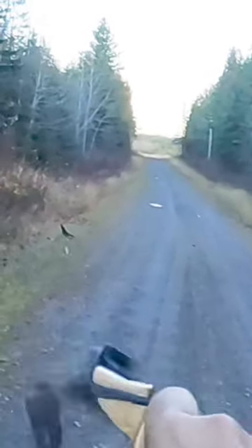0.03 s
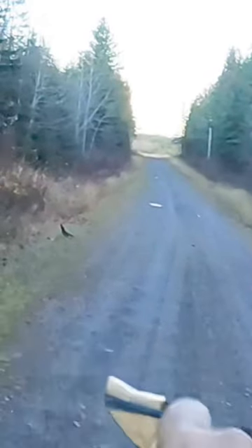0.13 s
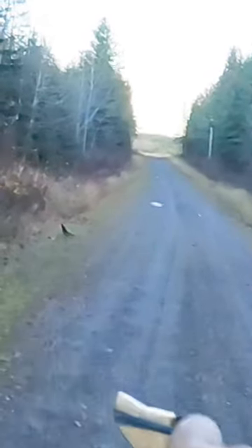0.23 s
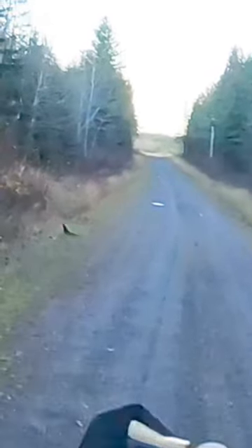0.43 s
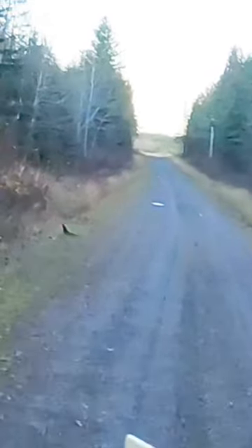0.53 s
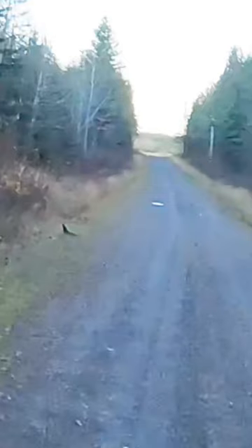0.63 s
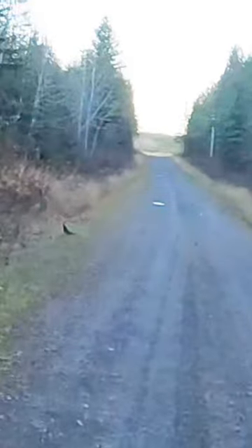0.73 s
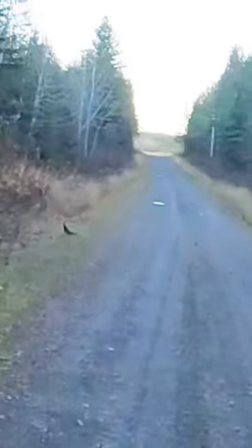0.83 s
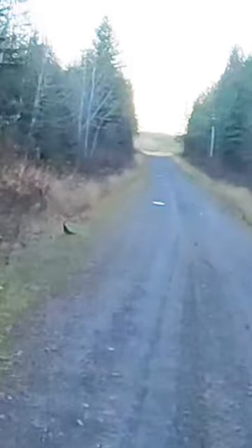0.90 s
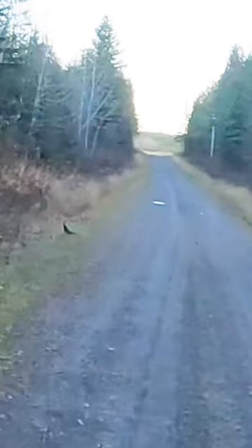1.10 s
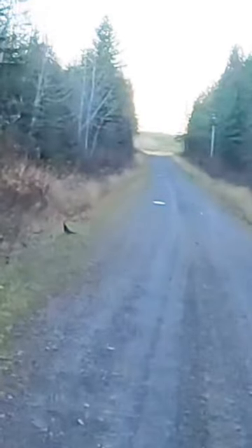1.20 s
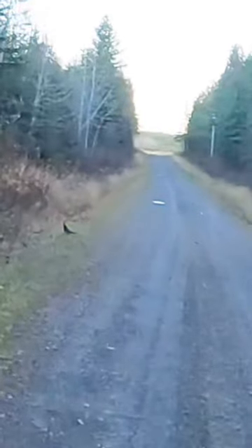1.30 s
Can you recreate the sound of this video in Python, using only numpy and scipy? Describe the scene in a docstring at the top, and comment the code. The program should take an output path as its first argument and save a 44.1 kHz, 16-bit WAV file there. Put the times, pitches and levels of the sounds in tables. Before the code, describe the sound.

Close slingshot shot outdoors, pouch popping free and bands slapping the fork, over muffled wind rumble

```python
"""Slingshot let go between trees

A slingshot is let go on a gravel track, close to a muffled pair of microphones. Wind is shaped noise;
the pouch pops free as suction pulses, and the bands swish as noise with a sinking whistle.
They slap the fork as short rings with a rattle, and slow pressure swings thud on the microphones.
Slack bands and far impacts tick as small rings, and scattered delays make the trees echo."""
import sys
import numpy as np
from scipy import signal
from scipy.io import wavfile
from scipy.ndimage import uniform_filter1d

SR = 44100
rng = np.random.default_rng(int(sys.argv[2]) if len(sys.argv) > 2 else 0)


def gain_from_decibels(decibels):
    """Convert decibel values to linear amplitude factors."""
    exponent = np.asarray(decibels, float) / 20
    return 10 ** exponent


def pcm_store(signal):
    """Save signal as 16-bit PCM."""
    levels = np.round(np.clip(np.atleast_2d(signal), -1, 1) * 32767)
    wavfile.write(sys.argv[1], SR, levels.astype(np.int16).T)


N = 59535  # samples, 1.35 s


def evened(x):
    """Brings a signal to rms 1."""
    return x / np.sqrt(np.mean(x ** 2) + 1e-20)


def read(points, hz):
    """Reads a curve at any frequency, straight lines over log frequency."""
    f, value = np.transpose(points)
    return np.interp(np.log(hz + 1), np.log(f + 1), value)


def pan(db):
    """Left and right gains that stand db apart, left louder when positive."""
    return gain_from_decibels(np.array([[db], [-db]]) / 2)


def level(curve, t):
    """Gain that follows a level curve, straight lines in dB."""
    s, db = np.transpose(curve)
    return gain_from_decibels(np.interp(t, s, db))


def ring(t, hz, t60, rise_s):
    """A tone that swells to its peak at t = 0 and dies away; at 0 Hz, the bare envelope."""
    envelope = gain_from_decibels(np.where(t < 0, -10 * (t / rise_s) ** 2, -60 * t / t60))
    return uniform_filter1d(envelope, size=21) * np.cos(2 * np.pi * hz * t)


# how alike the two sides of every noise are: f/Hz, likeness (1 = identical)
LIKENESS = [(60, 0.97), (140, 0.94), (310, 0.96), (700, 0.76), (1590, 1), (3600, 0.44)]


def noise(tone, size, patchy_db, swell_db, alike=0.97):
    """Stereo noise of a given colour with drifting patches and a shared flicker, rms 1."""
    frames = 4 * N // size + 5
    hz = np.fft.rfftfreq(size, 1 / SR)
    a, b, c, d, patches = rng.standard_normal((frames, len(hz), 5)).T
    swell = evened(uniform_filter1d(patches[0], size=3))
    patches = uniform_filter1d(patches, size=4, axis=0)
    patches = evened(uniform_filter1d(patches, size=4, axis=1))
    # the right side shares part of the left and fills up with its own noise
    same = np.clip(alike * read(LIKENESS, hz), -1, 1)[:, None]
    left = a + 1j * b
    z = np.array([left, same * left + np.sqrt(1 - same ** 2) * (c + 1j * d)])
    inside = (hz >= tone[0][0]) & (hz <= tone[-1][0])
    colour_db = read(tone, hz)[:, None] + patchy_db * patches + swell_db * swell
    z *= inside[:, None] * gain_from_decibels(colour_db)
    return evened(signal.istft(z, nperseg=size, noverlap=3 * size // 4)[1][:, :N])


# wind rumble before and after the shot, one list each: t/s, level/dB
RUMBLE_LEVEL = [
    [(0.0, -47.5), (0.038, -31), (0.05, -45), (0.064, -54), (0.072, -43.5), (0.16, -29.5)],
    [(0.36, -37.5), (0.508, -31), (0.714, -37), (0.724, -52), (0.758, -35), (0.932, -42.5), (1.024, -32.5),
     (1.202, -41.5), (1.256, -34), (1.35, -36.5)],
]
# colour of the rumble: f/Hz, relative level/dB per Hz
RUMBLE_TONE = [(2.4, -30), (4.0, -7.5), (17, 5), (24, -9), (38, -16), (59, -10.5), (71, -28), (108, -32),
               (130, -34), (170, -56), (290, -120)]
# level of the roar, pressed down after the snap and slowly recovering: t/s, level/dB
ROAR_LEVEL = [(0.0, -45), (0.18, -46), (0.432, -56.5), (0.536, -60.5), (0.774, -61.5), (0.966, -53),
              (1.194, -51.5), (1.35, -48.5)]
# colour of the roar: f/Hz, relative level/dB per Hz
ROAR_TONE = [(41, -35), (70, 0), (113, 1.5), (382, -8.5), (509, -18), (555, -19), (700, -19.5),
             (910, -47.5), (1540, -120)]
# colour of the leaf hiss: f/Hz, relative level/dB per Hz
LEAVES_TONE = [(260, -34), (450, -6.5), (511, -3.5), (571, -19), (631, -3.5), (997, -8), (1180, -5),
               (1690, -18), (4000, -58), (5200, -83.5), (8800, -120)]
LEAVES_DB = -59.5


def wind(t):
    """Lumpy rumble on the microphones, a roar that sinks after the snap, and the hiss of leaves."""
    before, after = RUMBLE_LEVEL
    rumble = level(before + after, t) * noise(RUMBLE_TONE, size=8192, patchy_db=0.95, swell_db=-0.1)
    roar = level(ROAR_LEVEL, t) * noise(ROAR_TONE, size=1024, patchy_db=3.0, swell_db=-1.0)
    leaves = gain_from_decibels(LEAVES_DB) * noise(LEAVES_TONE, size=512, patchy_db=-1.5, swell_db=-0.1)
    return rumble + roar + leaves


# how long the echoes last: f/Hz, t60/s
ECHO_T60 = [(300, .3), (800, 0.3), (1500, 1.9), (2000, 2), (2500, 0.39), (3200, 2.5)]
# colour of the echoes: f/Hz, relative level/dB
ECHO_TONE = [(200, -20.5), (600, -9), (1100, -2), (1650, -3.5), (1950, 1), (2700, 6.5), (3050, 0),
             (3500, 5.5), (4000, 0.5)]
ECHO_DB, ECHO_START_S = -25.5, 0.03


def trees(x):
    """Scattered echoes from the trunks, each band dying at its own speed."""
    strength = gain_from_decibels(2.2 * rng.exponential(1, SR))
    sparse = rng.random(SR) < 0.15
    taps = rng.standard_normal((3, SR)) * strength * sparse
    taps = taps[0] + 0.55 * taps[1:]  # a common part, and some of each side's own
    taps[:, :round(ECHO_START_S * SR)] = 0
    hz, t, z = signal.stft(taps, SR, nperseg=256)
    fade_db = read(ECHO_TONE, hz)[:, None] - 60 * t / read(ECHO_T60, hz)[:, None]
    tail = signal.istft(z * gain_from_decibels(fade_db), SR, nperseg=256)[1]
    tail = tail / np.linalg.norm(tail[0])
    mono = x.mean(0)[None]
    return gain_from_decibels(ECHO_DB) * signal.fftconvolve(mono, tail, axes=1)[:, :N]


# slack bands and far impacts: t/s, level/dB, f/Hz, t60/s, left-right/dB
TICK_RINGS = [(0.3136, -29.5, 1520, .025, -4.5), (.333, -36.5, 1256, .025, -3), (.343, -45, 2080, 0.01, -1),
              (.371, -43.5, 420, 0.017, -6), (.381, -43.5, 375, 0.018, -5), (0.389, -46, 1500, 0.011, -4),
              (.4140, -40, 1570, 0.012, -2), (.459, -47, 1199, 0.033, 2.5), (.477, -40, 645, 0.019, -7),
              (0.4846, -33, 910, 0.0085, -9), (0.4851, -37.5, 434, 0.019, 0),
              (0.5324, -35.5, 1560, 0.014, -4), (.539, -50.5, 2420, 0.012, 8)]
# colour of the scatter around each tick: f/Hz, relative level/dB per Hz
SCATTER_TONE = [(150, -31.5), (250, -0.5), (284, -3), (1600, -7), (1970, -17.5), (2460, -17), (3400, -24),
                (4000, -61), (5200, -91), (8800, -120)]
SCATTER_DB, SCATTER_T60_S = -14.5, 0.076  # level against its tick


def ticks(t):
    """Small quick rings of slack bands and far impacts, each with a broad scatter of noise."""
    scatter = gain_from_decibels(SCATTER_DB) * noise(SCATTER_TONE, size=256, patchy_db=2, swell_db=-0.5)
    out = np.zeros((2, N))
    for s, db, hz, t60, lr_db in TICK_RINGS:
        tick = ring(t - s, hz, t60, 0.00058)
        spray = scatter * ring(t - s, 0, SCATTER_T60_S, 0.0012)
        out += gain_from_decibels(db) * pan(lr_db) * (tick + spray)
    return out


# rubber ringing on the fork: t/s of the peak, f/Hz, level/dB, t60/s, left-right/dB
SLAP_RINGS = [(.2784, 1347, -7, .014, -1.5), (.2797, 1680, -8, .018, 0.5), (.2833, 790, -6, 0.0046, -4),
              (.2785, 860, -13.5, .012, -4.5), (.2810, 1085, -14, .016, -4), (.2800, 2148, -16.5, .016, -1),
              (.2795, 2420, -19, 0.016, -2.5), (.2800, 3009, -22, .018, -4), (.2785, 270, -19.5, 0.025, -9)]
# air shoved at the microphones: t/s of the peak, f/Hz, pressure (negative = suction),
# width/s, left-right/dB
AIR_THUDS = [(0.219, 40, -0.17, 0.0048, 1.5), (.232, 35, -0.26, 0.0068, -1), (.264, 21, .33, .012, -2),
             (0.2909, 30, .4, .007, 1), (0.2987, 30.05, -0.087, .006, -13.5)]
THUD_RIGHT_LEAD_S = 0.0028


def thuds(t):
    """Slow swings of pressure; those after the slap begins reach the right first."""
    out = np.zeros((2, N))
    for s, hz, peak, width, lr_db in AIR_THUDS:
        lead = THUD_RIGHT_LEAD_S * (s > SLAP_RINGS[0][0])
        u = t - s + np.array([[0], [lead]])
        out += peak * pan(lr_db) * np.exp(-(u / width) ** 2 / 2) * np.cos(2 * np.pi * hz * u)
    return out


# band noise before, between and after the blows, one list each: t/s, level/dB
SWISH_LEVEL = [
    [(0.16, -52.5), (0.18, -53.5), (0.196, -38), (0.208, -37)],
    [(0.226, -34), (0.248, -30.5), (0.27, -23.5)],
    [(0.292, -23.5), (0.302, -37.5), (0.314, -30), (0.324, -45.5), (0.334, -37), (0.356, -64),
     (0.37, -53.5)],
]
# colour of the band noise, also of the slap's rattle: f/Hz, relative level/dB per Hz
BAND_TONE = [(59, -29), (100, 0), (198, -22), (315, -13.5), (672, -15.5), (797, -18.5), (1530, -16),
             (2360, -27.5), (2710, -38.5), (3060, -31.5), (4050, -63.5), (5260, -99), (8910, -120)]
# pitch of the whistle: t/s, f/Hz
WHISTLE_PITCH = [(.19, 2000), (.238, 1950), (.25, 1600), (.268, 1498), (.32, 1441)]
WHISTLE_DB = -13.5  # against the flutter
FUZZ_HZ = 240  # width that one smoothing pass would give; the second narrows it


def swish(t):
    """Bands fluttering through the air, with a fuzzy whistle that sinks as they slow."""
    curve = [(0.12, -66)] + [row for part in SWISH_LEVEL for row in part] + [(0.42, -66.5)]
    s, hz = np.transpose(WHISTLE_PITCH)
    # slow noise on a sine and a cosine makes a narrow band around the pitch
    r = np.exp(-np.pi * FUZZ_HZ / SR)
    fuzz = rng.standard_normal((2, N))
    for _ in range(2):
        fuzz = signal.lfilter([1 - r], [1, -r], fuzz)
    phase = 2 * np.pi * np.cumsum(np.interp(t, s, hz)) / SR
    whistle = evened(fuzz[0] * np.cos(phase) + fuzz[1] * np.sin(phase))
    flutter = noise(BAND_TONE, size=256, patchy_db=2, swell_db=2.0, alike=0.87)
    return level(curve, t) * (flutter + gain_from_decibels(WHISTLE_DB) * whistle)


SLAP_RISE_S, RIGHT_LEAD_S, KNOCK_AFTER_S = 0.003, 0.00007, 0.0022
RATTLE_DB, RATTLE_RISE_S, RATTLE_T60_S = -17, 0.004, 0.052


def slap(t):
    """The rubber's short rings, a touch earlier on the right, plus a rattle of noise under the blow."""
    both = t + np.array([[0], [RIGHT_LEAD_S]])
    blow_s = SLAP_RINGS[1][0]
    rings = np.zeros((2, N))
    for s, hz, db, t60, lr_db in SLAP_RINGS:
        # the closing knock rises faster
        rise_s = SLAP_RISE_S * (0.5 if s > blow_s + KNOCK_AFTER_S else 1)
        rings += gain_from_decibels(db) * pan(lr_db) * ring(both - s, hz, t60, rise_s)
    envelope = ring(t - blow_s, 0, RATTLE_T60_S, RATTLE_RISE_S)
    rattle = envelope * noise(BAND_TONE, size=256, patchy_db=4, swell_db=3.5, alike=1.0)
    return rings + gain_from_decibels(RATTLE_DB) * rattle


# pouch slipping out of the fingers: t/s, level/dB, pulse width/ms, left-right/dB
POUCH_POPS = [(0.2, -23, 0.47, 5), (.2161, -11, 0.24, 8.5), (0.2186, -5.5, 0.42, 6.5),
              (.2144, -22, .7, 2.5)]
# dull ring of the leather, one row: t/s of the peak, f/Hz, level/dB, t60/s, left-right/dB
LEATHER_RING = (.2206, 480, -23, .08, 5)
POP_OVERSHOOT = 0.51  # strength of the rebound


def pouch(t):
    """Short suction pulses with a rebound on either side, then a dull ring of the leather."""
    pulses = np.zeros((2, N))
    for s, db, ms, lr_db in POUCH_POPS:
        u = (t - s) * 1000 / ms
        pulses -= gain_from_decibels(db) * pan(lr_db) * (1 - POP_OVERSHOOT * u ** 2) * np.exp(-u ** 2 / 2)
    s, hz, db, t60, lr_db = LEATHER_RING
    return pulses - gain_from_decibels(db) * pan(lr_db) * ring(t - s, hz, t60, 0.003)


def scene():
    """The shot close by, its echoes, and everything around it."""
    t = np.arange(N) / SR
    near = pouch(t) + slap(t) + swish(t)
    return wind(t) + trees(near) + ticks(t) + thuds(t) + near


def low_pass(x):
    """Removes everything above the highest recorded frequency."""
    return signal.sosfilt(signal.butter(12, 4200, fs=SR, output="sos"), x)


MUFFLE_HZ, CEILING = 3950, 0.9  # ceiling where full scale is 1


def record(dry):
    """The microphones lose everything above a few kilohertz; the loudest crests then hit the ceiling."""
    muffle = signal.firwin(401, MUFFLE_HZ, window=("kaiser", 12), fs=SR)
    dull = signal.oaconvolve(dry, muffle[None], "same")
    return low_pass(np.clip(dull, -CEILING, CEILING))


dry = scene()
out = record(dry)
pcm_store(out)
```